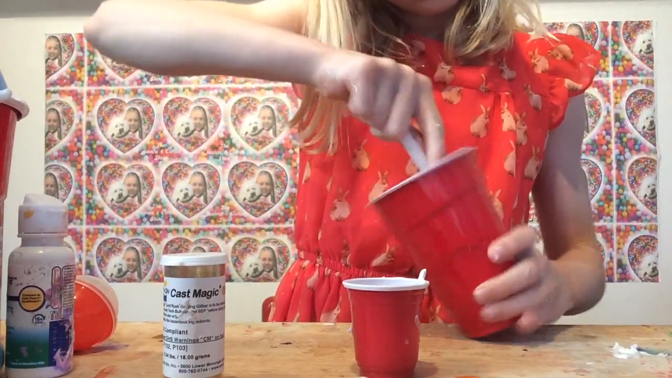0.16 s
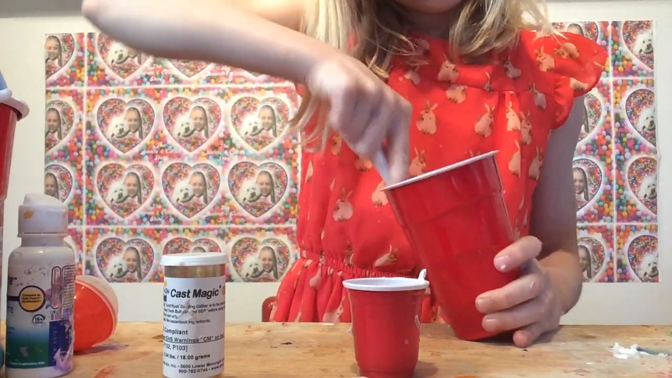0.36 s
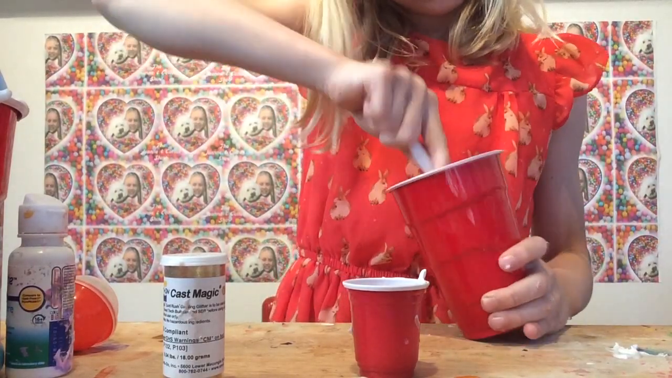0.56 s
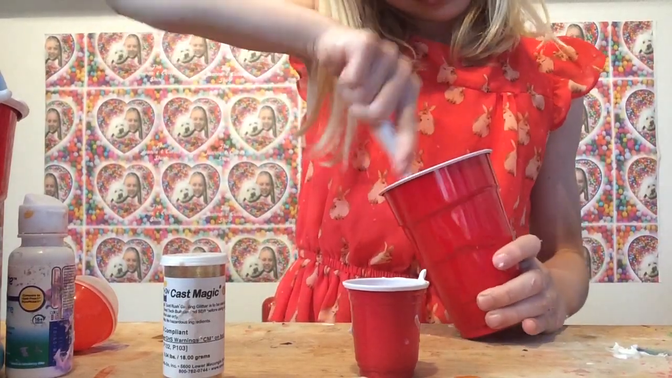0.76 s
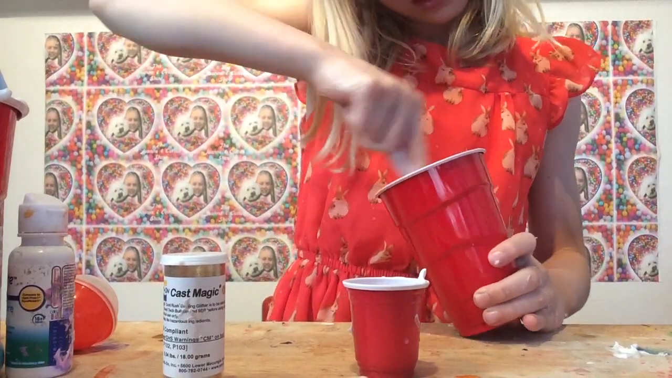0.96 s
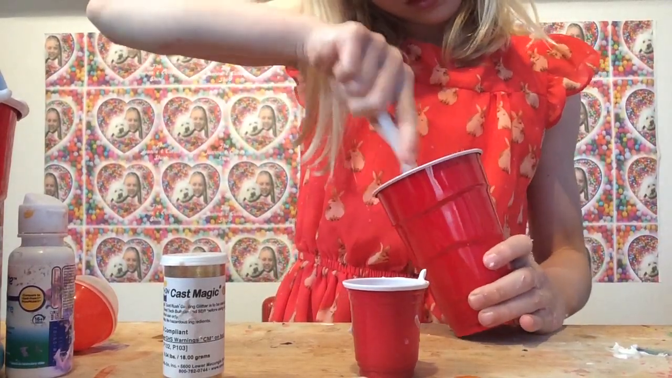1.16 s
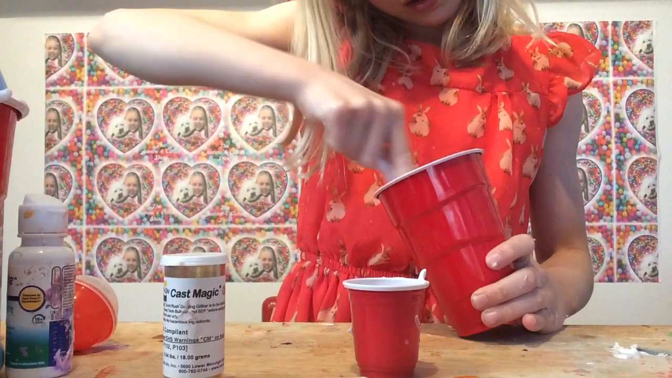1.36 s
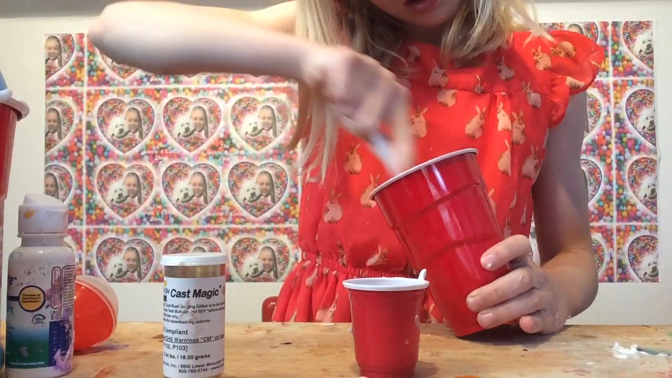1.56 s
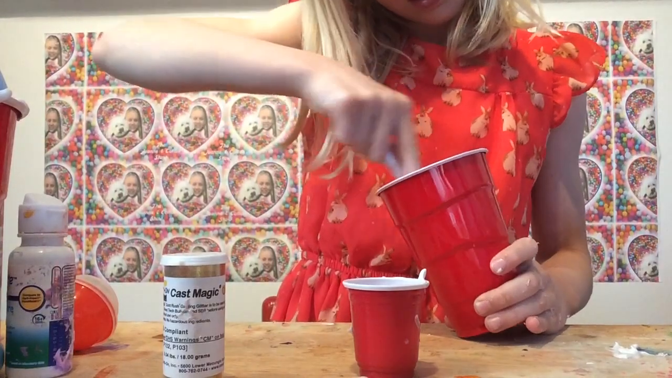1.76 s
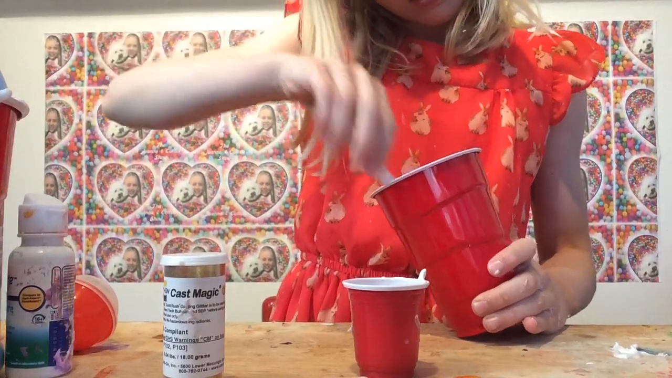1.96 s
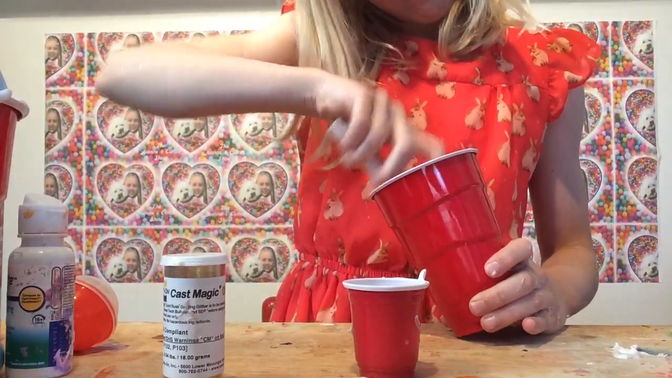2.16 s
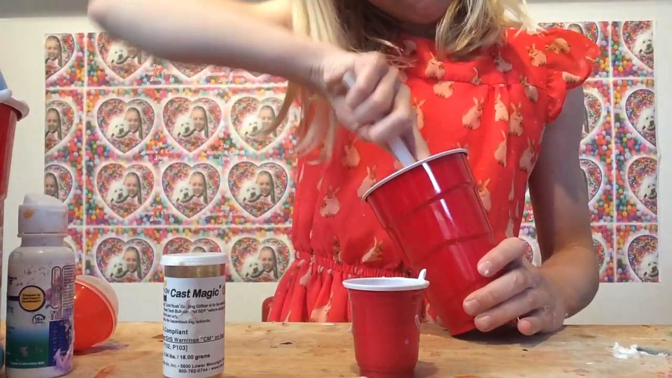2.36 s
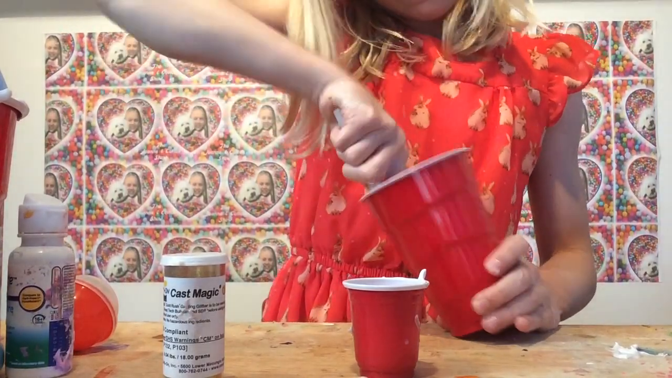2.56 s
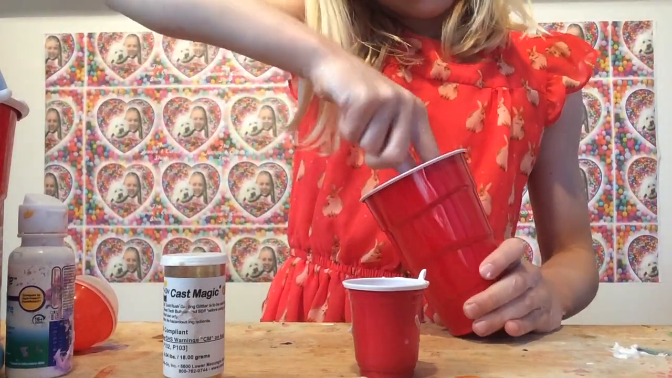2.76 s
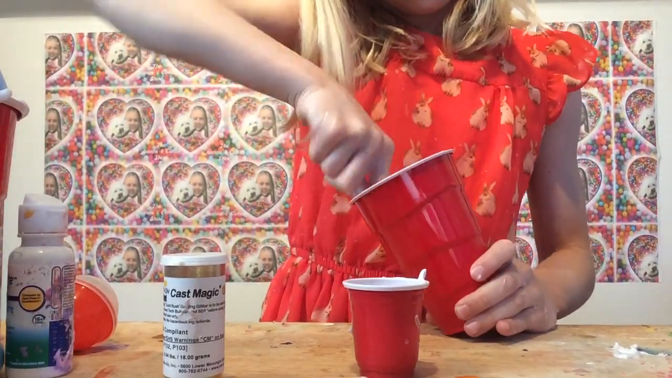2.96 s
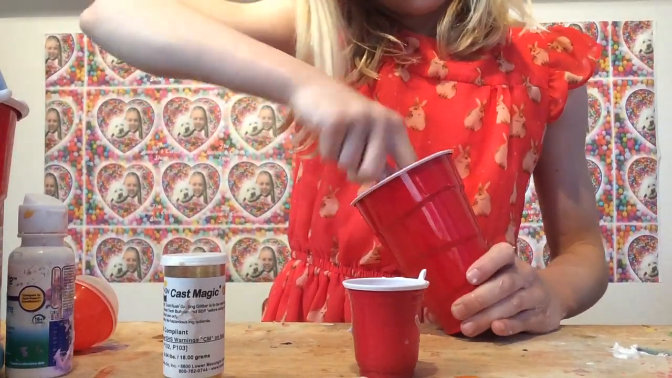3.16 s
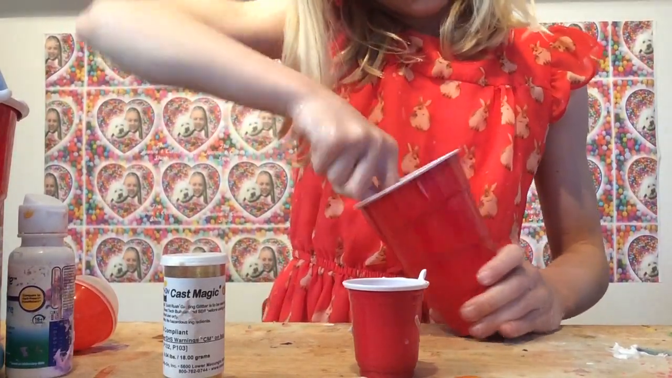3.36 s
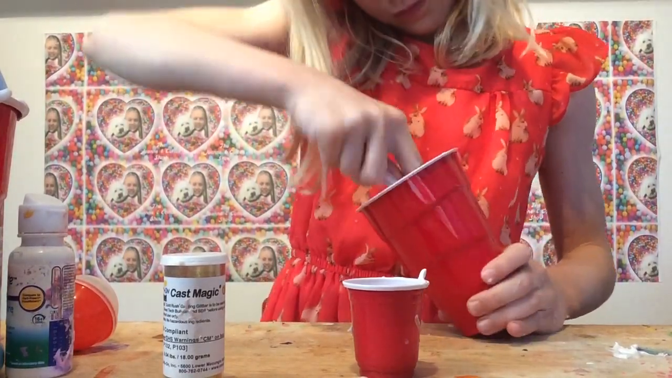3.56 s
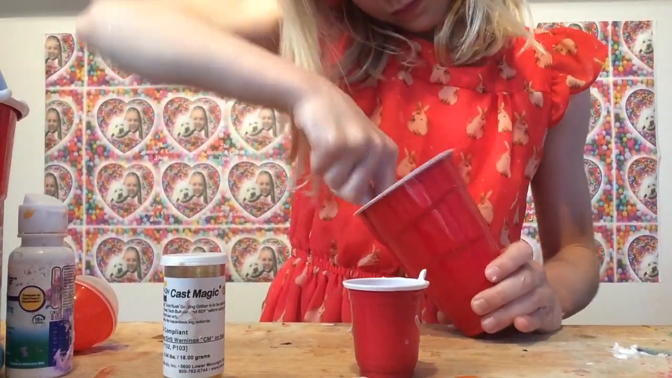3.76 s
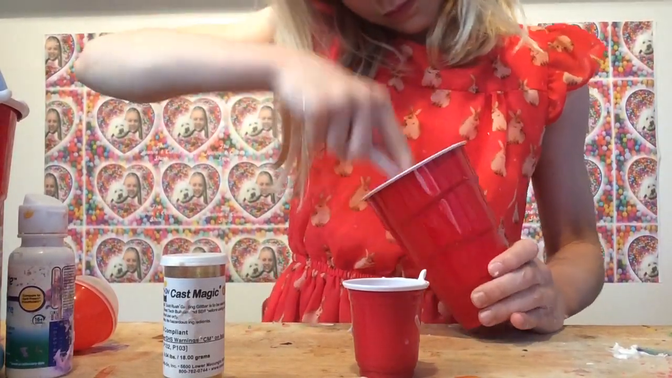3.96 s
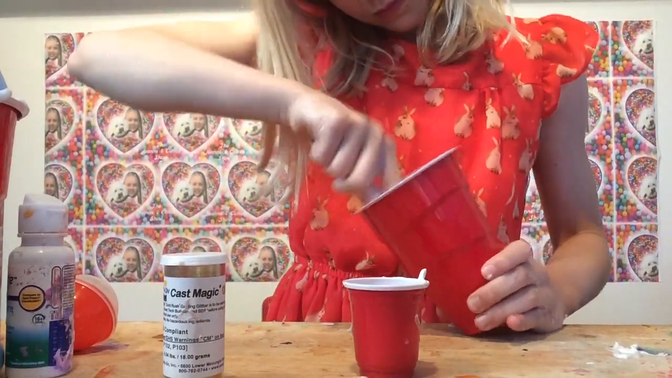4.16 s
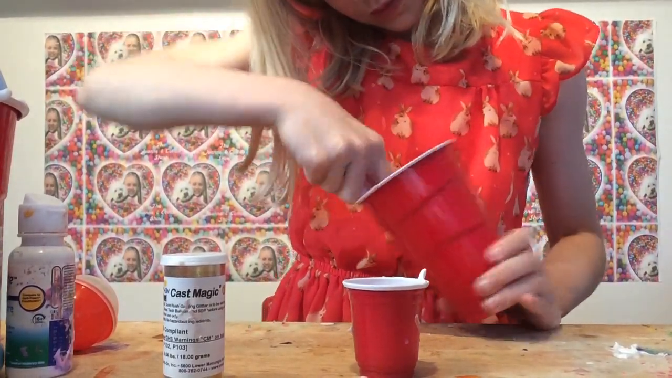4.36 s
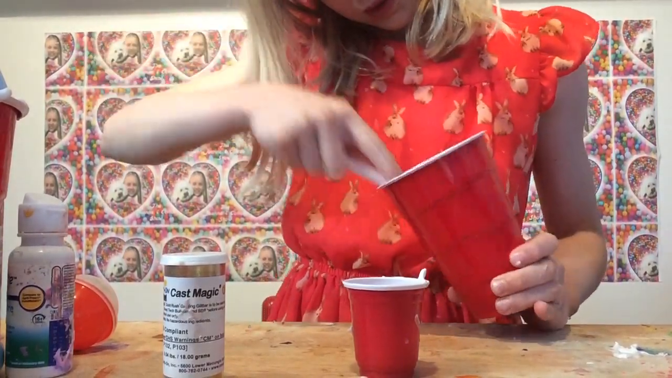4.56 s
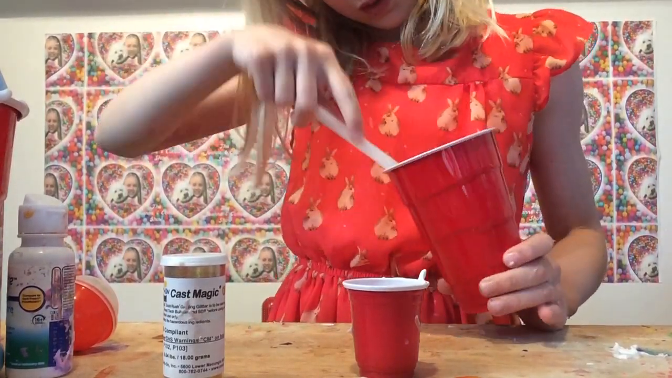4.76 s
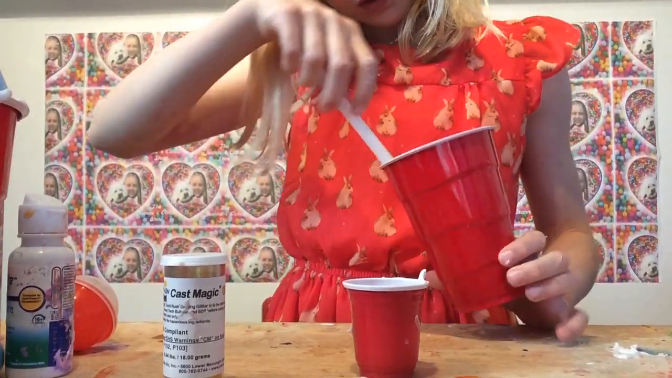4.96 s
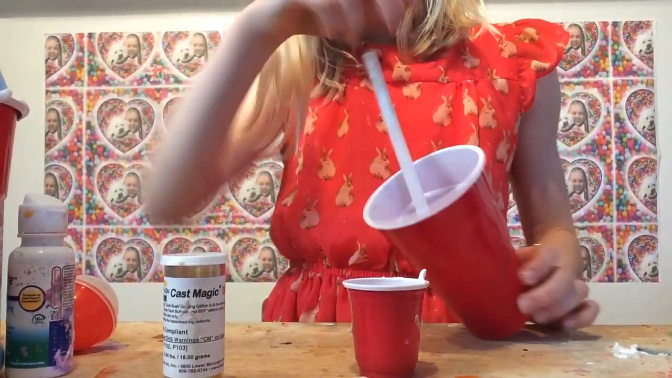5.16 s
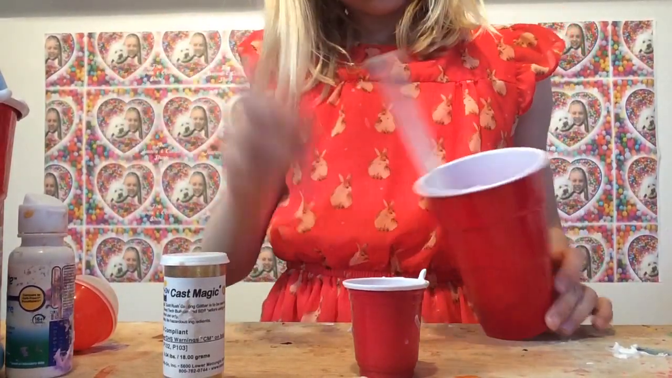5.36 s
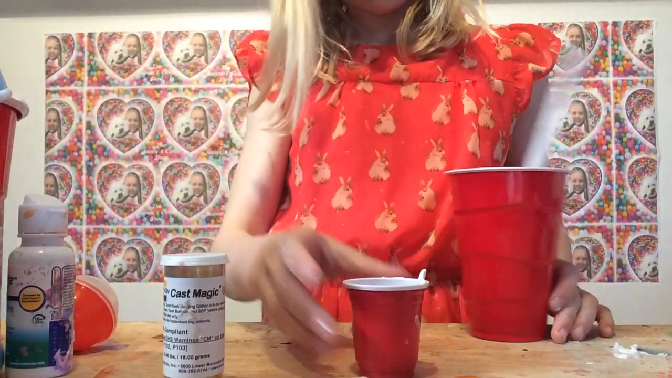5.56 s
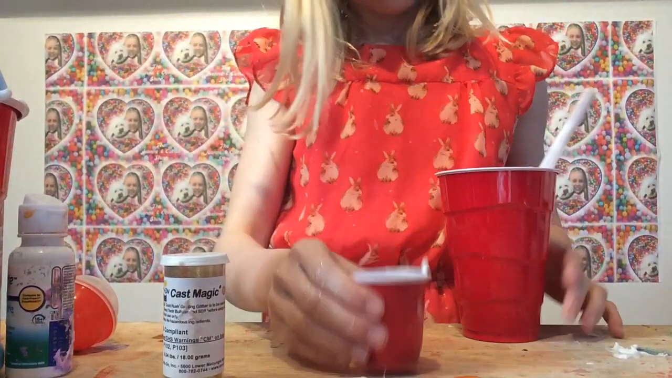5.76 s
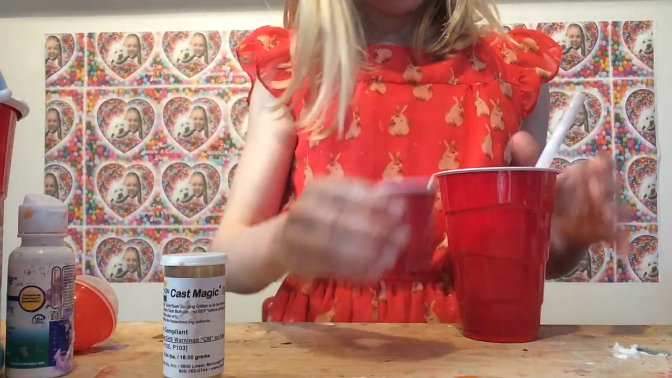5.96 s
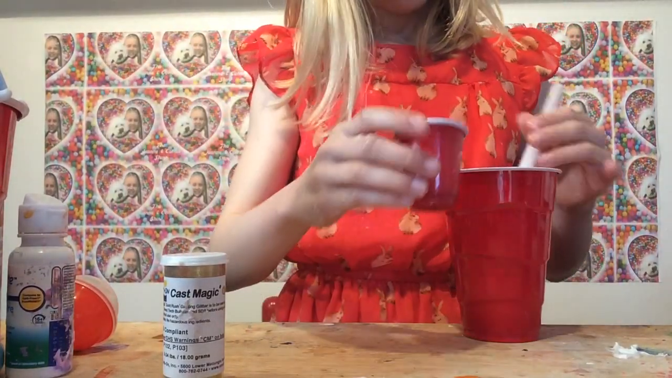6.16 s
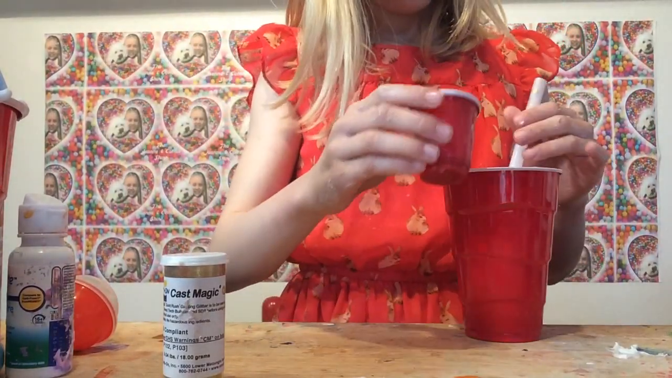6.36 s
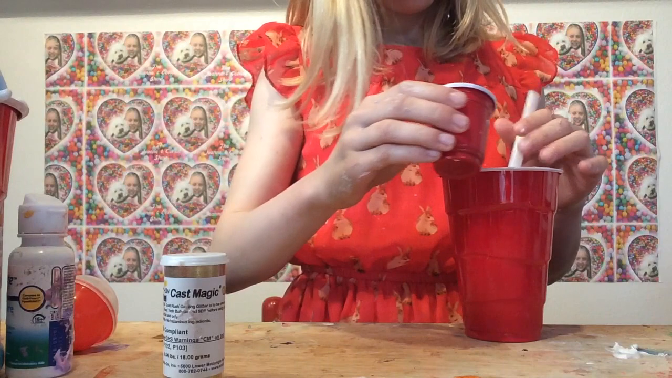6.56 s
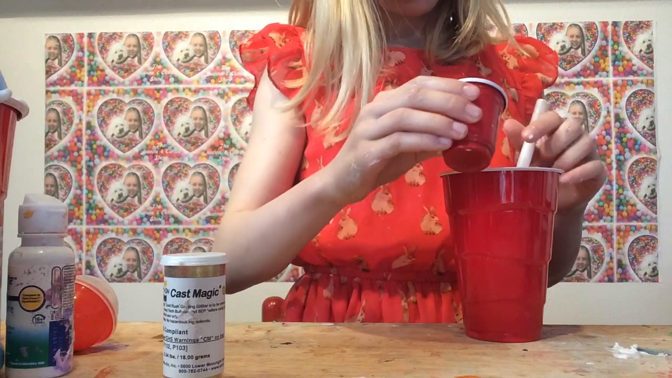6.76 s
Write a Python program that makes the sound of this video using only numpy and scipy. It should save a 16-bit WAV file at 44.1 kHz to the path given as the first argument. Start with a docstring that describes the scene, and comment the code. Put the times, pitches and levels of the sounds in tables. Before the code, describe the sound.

A plastic stirrer knocks and scrapes through sticky goo in a thin plastic cup, with wet smacks and one loud hollow thump.

```python
"""First a plastic stirrer works a sticky mix in a thin, tilted plastic cup on a wooden table, close to the microphone.
Its turns knock the cup's bottom, clack the wall and thud the table: decaying modes, with noise in the clacks.
In between, the mix smears, smacks and pops: filtered random clicks, and short chirps with noise splashes.
Then the cup is stood upright, the stirrer falls against the rim and rattles to rest.
A small quiet room answers throughout with echoes and a steady low rumble under hiss."""
import sys
import numpy as np
from scipy import signal
from scipy.fft import rfft, irfft
from scipy.io import wavfile
from scipy.ndimage import uniform_filter1d

SR = 44100
rng = np.random.default_rng(int(sys.argv[2]) if len(sys.argv) > 2 else 0)


def to_wav(sig):
    """Store sig (one row per channel, or 1-D mono) as 16-bit WAV at the path in sys.argv[1].

    Samples outside -1..1 are clipped; the rate is SR.
    """
    pcm = np.clip(np.atleast_2d(sig), -1, 1) * 32767
    pcm = np.round(pcm).astype(np.int16)
    wavfile.write(sys.argv[1], SR, pcm.T)  # frames by channels


N = 299989
TIME = np.arange(N) / SR  # s, whole scene
AGE = np.arange(SR // 4) / SR  # s, one short event
STIR_END_S = 4.7  # the hand lets go
CAVITY_HZ, CAVITY_WIDTH_HZ = 780, 85  # the air in the cup; rubbing uses its own widths


def undb(db):
    """Decibels to gain."""
    return 10 ** (np.asarray(db) / 20)


def level(x, db):
    """Set a steady sound to a given rms level."""
    return x * undb(db) / np.sqrt(np.mean(x ** 2))


def burst(x, db):
    """Give a short sound the energy of 10 ms at a given rms level."""
    return x * undb(db) / np.sqrt(np.sum(x ** 2) / (SR / 100))


def add(track, s, x):
    """Mix a sound in at time s."""
    start = max(int(s * SR), 0)
    track[start:start + len(x)] += x[:N - start]


def resonate(x, hz, width_hz):
    """One resonance, gain 1 at its centre."""
    centre = min(hz, SR / 2 - 1000)
    sharpness = hz / min(width_hz, SR / 4)
    return signal.lfilter(*signal.iirpeak(centre, sharpness, fs=SR), x)


def band(x, lo_hz, hi_hz, order=2):
    """Band-pass between two edges."""
    edges = [lo_hz, min(hi_hz, SR / 2 - 100)]
    return signal.sosfilt(signal.butter(order, edges, "band", fs=SR, output="sos"), x)


def walk(rate):
    """Smooth random drift with a spread near 1, redrawn at a rate in Hz."""
    hold = int(SR / rate)
    steps = np.repeat(rng.standard_normal(N // hold + 1), hold)
    return 1.4 * uniform_filter1d(steps, hold)[:N]


def grains(size, rate, spread_db):
    """Random tiny clicks at a mean rate per second, mostly weak and a few strong."""
    chance, sign, strength = rng.random(size), rng.standard_normal(size), rng.exponential(size=size)
    return (chance < rate / SR) * sign * undb(abs(spread_db) * np.minimum(strength, 4))


def ring(hz, t60, rise_s):
    """A mode that builds up while the contact lasts and then dies away."""
    decay = np.exp(-np.log(1000) * AGE / t60)
    return np.sin(2 * np.pi * hz * AGE) * decay * (1 - np.exp(-AGE / rise_s))


def knock(hz, t60):
    """The bottom, damped by the mix, swings for a few cycles and sets the air in the cup ringing."""
    bottom = ring(hz, t60, 0.0017)
    air = 0.5 * resonate(bottom, CAVITY_HZ, CAVITY_WIDTH_HZ)
    # so small a surface radiates little bass
    return band(bottom + air, 290, 9000)


# Modes of the table under the cup: f/Hz, relative level/dB, t60/s (nominal: each thud varies level and f)
TABLE_MODES = [(61, 5.5, .1), (96, -0.5, 0.12), (127, 1.5, 0.15), (164, -1, .07), (206, -1.5, 0.093),
               (277.2, -1, 0.059), (361, 4, 0.071), (426.4, 0.5, 0.11)]


def thud(centre_hz):
    """The table takes the push through the cup's foot; a quicker push favours its higher modes."""
    out = 0
    for hz, db, t60 in TABLE_MODES:
        off_centre_db = min(3.5 * np.log2(hz / centre_hz) ** 2, 21)
        weight_db = db - off_centre_db + 2.2 * rng.standard_normal()
        varied_hz = hz * (1 + 0.014 * rng.standard_normal())
        out = out + rng.choice([-1, 1]) * undb(weight_db) * ring(varied_hz, t60, 0.00067)
    return out


# Push hardness to thud colour: hollow knock level/dB, thud centre f/Hz
THUD_COLOUR = [(-50.5, 172), (-37, 300), (-21.5, 330), (-11.5, 560)]


def thud_centre(db):
    """A harder push is quicker and reaches the table's higher modes."""
    return np.interp(db, *np.transpose(THUD_COLOUR))


# Modes of the cup's wall: f/Hz, relative level/dB, t60/s (nominal: each clack varies level and f)
WALL_MODES = [(950, -2.5, 0.05), (1120, -8, 0.012), (1392, 4, 0.037), (1630, 5, 0.041), (1785, -1.5, 0.032),
              (2078, -9, 0.024), (2450, -5.5, 0.053), (2802, -5, 0.041), (3690, -1.5, 0.056)]


def wall(centre_hz):
    """The thin wall clacks; the point of contact favours modes near one pitch, over a brief buzz."""
    modes = 0
    for hz, db, t60 in WALL_MODES:
        off_centre_db = min(12 * np.log2(hz / centre_hz) ** 2, 13)
        weight_db = db - off_centre_db + 5.2 * rng.standard_normal()
        varied_hz = hz * (1 + 0.018 * rng.standard_normal())
        modes = modes + rng.choice([-1, 1]) * undb(weight_db) * ring(varied_hz, t60, 0.00041)
    noise = rng.standard_normal(len(AGE)) * np.exp(-AGE / .006)
    buzz = band(noise, 0.74 * centre_hz, 1.35 * centre_hz)
    return burst(modes, 0) + burst(buzz, -0.5)


# Resonances of the stirrer: f/Hz, width/Hz, relative level/dB (nominal: each tick varies f and level)
STIRRER_MODES = [(2870, 650, -5.5), (3840, 400, 12), (4570, 230, 15.5), (5380, 450, 11.5), (6100, 600, -3),
                 (6760, 540, -4), (7900, 180, -18.5), (14000, 2500, -10.5)]


def tick():
    """Hard plastic on plastic: a crack and tiny rebounds ring the stirrer, differently at each grip."""
    crack = rng.standard_normal(len(AGE)) * np.exp(-AGE / 0.0046) * (1 - np.exp(-AGE / 0.00055))
    rebounds = grains(len(AGE), rate=690, spread_db=6.5) * np.exp(-AGE / 0.033)
    contact = burst(crack, 0) + burst(rebounds, -15.0)
    grip = 1 + 0.046 * rng.standard_normal()  # shifts all resonances together
    body = 0
    for hz, width_hz, db in STIRRER_MODES:
        gain = undb(db + 0.67 * rng.standard_normal())
        body = body + gain * resonate(contact, hz * grip, width_hz)
    return band(body, 2100, 15000)


def rub_wall(slips):
    """Slips of the stirrer's tip sound through the wall's modes, broadened by the mix."""
    modes = sum(undb(db) * resonate(slips, hz, .2 * hz) for hz, db, _ in WALL_MODES)
    return modes + 0.1 * band(slips, 3500, 9800)


def hollow_rub(slips):
    """Slips stir the air in the cup."""
    return band(resonate(slips, CAVITY_HZ, 140), 300, 700)


CHATTER_T60_S = 0.19


def chatter():
    """Dense small rebounds of the cup die away in its hollow and its wall."""
    swell = np.exp(-np.log(1000) * AGE / CHATTER_T60_S) * (1 - np.exp(-AGE / 0.0023))
    rebounds = grains(len(AGE), rate=3200, spread_db=3.0) * swell
    wall_rattle = band(rub_wall(rebounds), 800, 1900, order=3)
    return burst(hollow_rub(rebounds), 0) + burst(wall_rattle, -6.5)


# Wall and stirrer against the knock, dB; the wall is touched near its foot
KNOCK_WALL_DB, KNOCK_TICK_DB, KNOCK_WALL_HZ = -14, -32, 1419
# Chatter level at the reference knock, and its growth in dB per dB of knock
HARD_KNOCK_DB, CHATTER_DB, CHATTER_GROWTH = -12.5, -25, 3.5
# The bottom loaded by the mix, then free: f/Hz, t60/s (knocks shorten the t60 to 0.6 of this)
BOTTOM_SWING = [(670, .021), (745, 0.087)]
# The stirrer drives the bottom onto the table, about once a turn:
# t/s, hollow knock level/dB, knock f/Hz, table thud level/dB
KNOCK_CUES = [(0.2529, -45.5, 675, -47), (0.593, -53, 653, -51.5), (0.649, -52, 688, -55),
              (0.927, -38.5, 618, -42.5), (1.3177, -40.5, 617, -44), (1.6655, -37, 550, -40.5),
              (1.6844, -45.5, 708, -44.5), (1.7137, -46, 718, -54.5), (2.5261, -33.5, 628, -41),
              (2.6074, -49, 700, -44.5), (2.7562, -48, 480, -44.5), (3.1084, -51.5, 705, -52.5),
              (3.2048, -55, 690, -60), (3.3452, -49, 744, -60), (3.3948, -58, 620, -42.5),
              (3.4794, -12.5, 673.6, -28), (3.7812, -43.5, 668, -43), (3.806, -47, 720, -42),
              (4.2122, -40.5, 632, -43), (4.2533, -38, 672, -32.5), (5.2368, -22, 706, -26.5),
              (5.52, -50, 734, -61.5), (5.5837, -40, 751, -45.5), (5.6275, -41, 727, -43)]


def knocks():
    """Bottom and table take the push; wall and stirrer follow weakly, and chatter outgrows the knock."""
    out = np.zeros(N)
    for s, db, hz, thud_db in KNOCK_CUES:
        t60 = 0.6 * np.interp(hz, *np.transpose(BOTTOM_SWING))
        add(out, s, burst(knock(hz, t60), db))
        add(out, s, burst(thud(thud_centre(db)), thud_db))
        add(out, s, burst(wall(KNOCK_WALL_HZ), db + KNOCK_WALL_DB))
        add(out, s, burst(tick(), db + KNOCK_TICK_DB))
        add(out, s, burst(chatter(), CHATTER_DB + CHATTER_GROWTH * (db - HARD_KNOCK_DB)))
    return out


# Taps and touches share the wall's centre and the bottom's pitch and decay
TAP_WALL_HZ, TAP_BOTTOM_HZ, TAP_T60_S = 1870, 739, .0168
# The stirrer clacks against the wall:
# t/s, wall level/dB, stirrer tick level/dB, cup hollow level/dB, table thud level/dB
TAP_CUES = [(0.395, -50, -50, -34.5, -48.5), (1.1071, -57, -69, -59, -60.5),
            (2.0017, -42, -38.5, -36.5, -44.5), (2.069, -51.5, -50, -39, -40), (2.0736, -45, -47, -38, -49),
            (2.272, -58, -63, -51.5, -51.5), (2.3951, -65, -65.5, -59.5, -57),
            (2.5741, -49.5, -44, -38, -41), (2.9759, -49, -68, -50, -57.5),
            (3.2411, -41.5, -52, -53.5, -72), (3.9813, -61.5, -82, -54, -58.5),
            (4.4697, -54.5, -57, -49, -52), (4.7092, -56, -61.5, -47, -67), (4.8173, -48, -52, -46.5, -61),
            (5.3453, -39, -34.5, -33.5, -47.5), (5.3606, -47, -47, -47, -60),
            (5.6827, -40.5, -45.5, -36.5, -43.5), (5.717, -49.5, -61, -65, -68),
            (5.805, -46.5, -49.5, -47.5, -56)]


def taps():
    """Wall and stirrer clack together; hollow and table join in, each at its own level."""
    out = np.zeros(N)
    for s, wall_db, tick_db, hollow_db, thud_db in TAP_CUES:
        add(out, s, burst(wall(TAP_WALL_HZ), wall_db))
        add(out, s, burst(tick(), tick_db))
        add(out, s, burst(knock(TAP_BOTTOM_HZ, TAP_T60_S), hollow_db))
        add(out, s, burst(thud(thud_centre(hollow_db)), thud_db))
    return out


DRAG_REF_DB = -71.5
SIDE_FOLLOW = .33  # how far wall sounds follow the drag, dB per dB
# How hard the stirrer drags through the mix: t/s, level/dB (heard relative to DRAG_REF_DB)
DRAG_CURVE = [(0.0, -66.5), (0.49, -69.5), (0.71, -78.5), (1.73, -75.5), (1.85, -72), (2.19, -72.5),
              (2.95, -73.5), (3.11, -66.5), (3.52, -69), (4.15, -79), (4.47, -67), (4.99, -79.5),
              (5.28, -79.5), (5.42, -66), (5.54, -68.5), (5.72, -71), (5.86, -83.5), (6.1, -85.5)]


def effort(s):
    """Drag in dB above or below its reference at time s."""
    return np.interp(s, *np.transpose(DRAG_CURVE)) - DRAG_REF_DB


# Sound levels at reference drag; once the hand lets go, the wall sinks by LET_GO_DB over LET_GO_S
BOTTOM_DB, SIDE_DB, LET_GO_DB, LET_GO_S = -73, -75.5, -5.5, 0.19


def stirring():
    """The stirrer sticks and slips along bottom and wall while the wet mix crackles, until the cup rests."""
    effort_db = effort(TIME)
    let_go = np.clip((TIME - STIR_END_S) / LET_GO_S, 0, 1)
    drag_db = BOTTOM_DB + effort_db
    scrape_db = SIDE_DB + SIDE_FOLLOW * effort_db + LET_GO_DB * let_go
    moving = np.interp(TIME, [5.8, 6.0], [1, 0])
    pressure = walk(45) + 0.33 * walk(7.9)
    slips = grains(N, rate=400, spread_db=2.0) * undb(1.7 * pressure)
    hollow = band(resonate(slips, CAVITY_HZ, 130) + 0.13 * resonate(slips, 450, 300), 210, 670)
    rumble = sum(undb(db) * resonate(slips, hz, 65) for hz, db, _ in TABLE_MODES)
    rasp = rub_wall(grains(N, rate=4000, spread_db=4.0) * undb(3.2 * pressure))
    wet_clicks = band(grains(N, rate=1300, spread_db=6.0), 4500, 15000, order=1)
    crackle = wet_clicks * undb(3 * walk(25) + 2 * walk(8))
    bottom = (level(hollow, 0) + level(rumble, 2.3)) * undb(drag_db)
    side = (level(rasp, -0.68) + level(crackle, -6.5)) * undb(scrape_db)
    return moving * (bottom + side)


# Levels at reference drag, before a random spread
TOUCH_WALL_DB, TOUCH_HOLLOW_DB, TOUCH_TICK_DB, TOUCH_SPREAD_DB = -70, -63.5, -74.5, 2.5


def touches():
    """The stirrer grazes the cup at random times while it turns, stronger when it drags hard."""
    out = np.zeros(N)
    for s, chance in zip(STIR_END_S * rng.random(size=22), rng.standard_normal(size=22)):
        db = SIDE_FOLLOW * effort(s) + TOUCH_SPREAD_DB * chance
        graze = burst(wall(TAP_WALL_HZ), TOUCH_WALL_DB) + burst(tick(), TOUCH_TICK_DB)
        hollow = burst(knock(TAP_BOTTOM_HZ, TAP_T60_S), TOUCH_HOLLOW_DB)
        add(out, s, undb(db) * (graze + hollow))
    return out


SCRAPE_S = .052
# The stirrer's tip dragged along the wall: t/s, wall level/dB (the hollow sits 7 dB above)
SCRAPE_CUES = [(0.128, -64.5), (0.975, -63.5), (1.365, -64), (2.314, -64), (2.658, -56), (2.918, -60),
               (4.41, -68.5)]


def scrapes():
    """Short gritty strokes that swell and fade, stirring the air in the cup as well."""
    out = np.zeros(N)
    for s, db in SCRAPE_CUES:
        stroke = np.sin(np.pi * np.minimum(AGE / SCRAPE_S, 1))
        slips = grains(len(AGE), rate=1100, spread_db=3.0) * stroke
        add(out, s, burst(rub_wall(slips), db) + burst(hollow_rub(slips), db + 7))
    return out


def smack(hz, length):
    """Sticky film tears in a spray of tiny clicks; length scales its rise and fall."""
    swell = (1 - np.exp(-AGE / (0.25 * length))) * np.exp(-AGE / (0.27 * length))
    tearing = grains(len(AGE), rate=3500, spread_db=3.5) * swell
    return band(resonate(tearing, hz, .9 * hz), 2800, 19000)


SMALL_SMACK_DB, SMALL_SMACK_HZ, SMALL_SMACK_S = -73, 8800, .006
# The clearest tears of film off the stirrer: t/s, level/dB, centre f/Hz, length scale/s
SMACK_CUES = [(0.111, -57.5, 6400, 0.071), (0.296, -62, 7300, 0.05), (0.48, -60.5, 5860, .028),
              (0.631, -65, 7900, 0.03), (0.793, -60.5, 6600, 0.005), (1.002, -65.5, 6900, 0.0052),
              (1.545, -63, 10100, .045), (1.635, -70, 10600, .015), (3.022, -62, 6800, 0.0047),
              (3.062, -58, 8800, 0.0034), (3.321, -64.5, 8650, 0.0083), (3.924, -68, 11000, 0.0087),
              (3.97, -70, 10800, 0.019), (4.437, -67.5, 10300, 0.016), (6.217, -71.5, 8900, .005)]
# Wet pops, as of air pockets opening: t/s, base level/dB, nominal f/Hz (chirp and splash set around these)
POP_CUES = [(0.381, -55.5, 2210), (1.117, -61.5, 2040), (1.8615, -57, 2020), (4.012, -62, 1890),
            (4.594, -54, 1590)]


def mix():
    """Sticky film tears in long and short smacks; opening air pockets chirp upwards."""
    out = np.zeros(N)
    for s, db, hz, length in SMACK_CUES:
        add(out, s, burst(smack(hz, length), db))
    for s in STIR_END_S * rng.random(size=6):  # small tears at random while the stirrer turns
        add(out, s, burst(smack(SMALL_SMACK_HZ, SMALL_SMACK_S), SMALL_SMACK_DB))
    for s, db, hz in POP_CUES:
        rising_hz = hz * (.92 + 0.335 * (1 - np.exp(-AGE / 0.0195)))
        bubble = ring(rising_hz, 0.03, 0.00071)
        noise = rng.standard_normal(len(AGE)) * np.exp(-AGE / 0.0074)
        splash = band(noise, 0.73 * hz, 1.205 * hz)
        add(out, s, burst(bubble, db + 2) + burst(splash, db + 1.0))
    return out


def wash(age, decay_s):
    """Dense reflections that die away, about equally strong at every pitch."""
    decay = np.exp(-np.log(1000) * age / decay_s)
    spectrum = rfft(rng.standard_normal(len(age)) * decay)
    # flatten the spectrum, then steepen the decay a little
    tail = irfft(spectrum / np.abs(spectrum), len(age)) * decay ** (1 / 3)
    return tail / np.linalg.norm(tail)


# First echoes from nearby surfaces: delay t/s, level/dB
EARLY_ECHOES = [(.0047, -23), (0.0127, -22.5), (.0188, -22.5), (.0246, -23.5), (0.0305, -25)]


def room(x):
    """A few early echoes, a quick wash from the nearby clutter, then the faint tail of the room."""
    age = np.arange(SR // 2) / SR
    diffuse = 0
    # low edge Hz, high edge Hz, decay setting s, level dB; the last is the room's tail
    for lo_hz, hi_hz, decay_s, db in [(40.2, 450, .23, -14.5), (450, 2200, .23, -16.0),
                                      (2180, 7800, .23, -12.0), (59.8, 8500, .43, -19.5)]:
        diffuse = diffuse + undb(db) * band(wash(age, decay_s), lo_hz, hi_hz, order=3)
    gap = np.zeros(int(.008 * SR))  # 8 ms before the wash
    response = np.concatenate([gap, diffuse])
    for delay, db in EARLY_ECHOES:
        response[int(delay * SR)] += undb(db)
    return x + signal.fftconvolve(x, response)[:N]


ROOM_TONE_DB = -68.5  # overall rms
# Colour of the room's background: f/Hz, relative level/dB per Hz
ROOM_COLOUR = [(25, -13.5), (55, -0.5), (88, 3), (125, -5.5), (210, -3.5), (320, -11.5), (520, -17.5),
               (900, -23.5), (3000, -27.5), (9000, -31.5), (13000, -34.5), (15000, -36)]


def room_tone():
    """Low steady rumble of the house under a smooth hiss, as coloured noise."""
    hz, db = np.transpose(ROOM_COLOUR)
    bins = np.arange(N // 2 + 1) * SR / N
    colour = undb(np.interp(np.log(bins + 1), np.log(hz), db))
    noise = irfft(rfft(rng.standard_normal(N)) * colour, N)
    return level(noise, ROOM_TONE_DB)


def scene():
    """Cup, mix and room at one microphone."""
    cup = knocks() + taps() + touches() + stirring() + scrapes()
    return (room(cup + mix()) + room_tone())[None]


def record(dry):
    """The microphone thins the deepest bass and a steep low-pass cuts the top."""
    thin = signal.sosfilt(signal.butter(1, 35, "high", fs=SR, output="sos"), dry)
    return signal.sosfilt(signal.ellip(10, .2, 70, 15450, fs=SR, output="sos"), thin)


dry = scene()
out = record(dry)
to_wav(out)
```